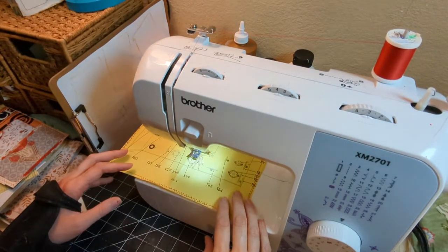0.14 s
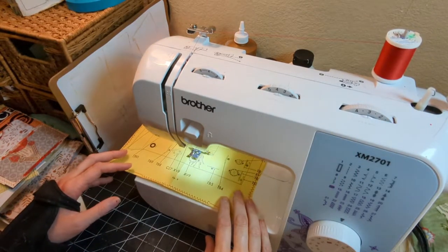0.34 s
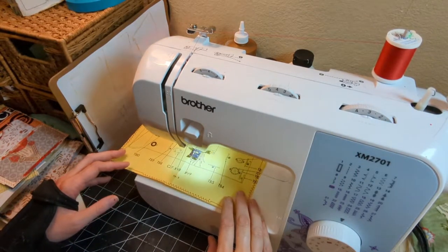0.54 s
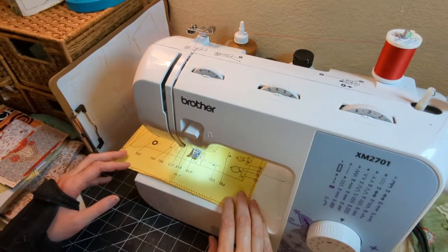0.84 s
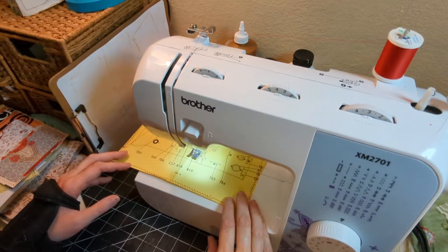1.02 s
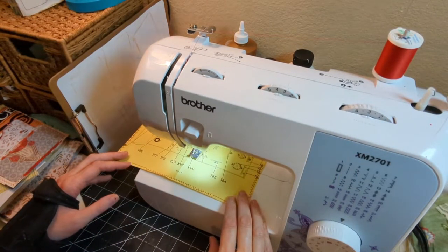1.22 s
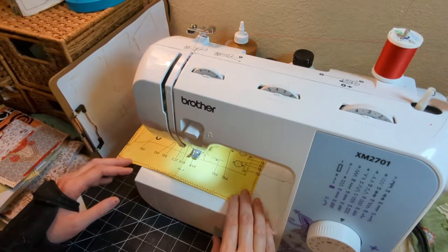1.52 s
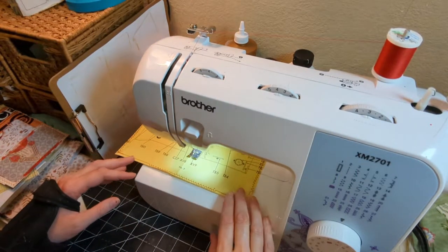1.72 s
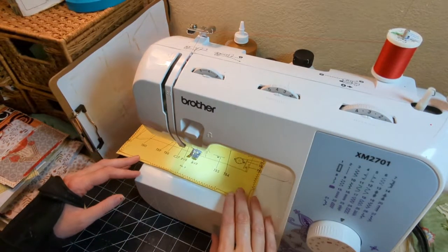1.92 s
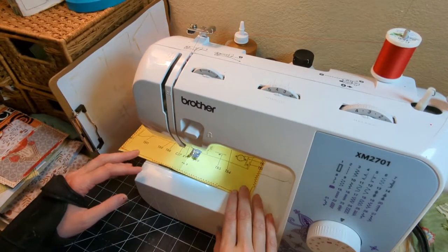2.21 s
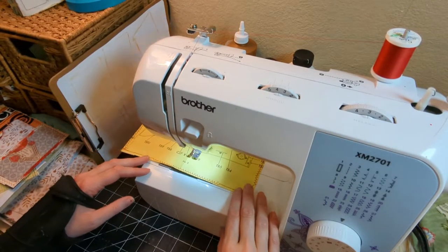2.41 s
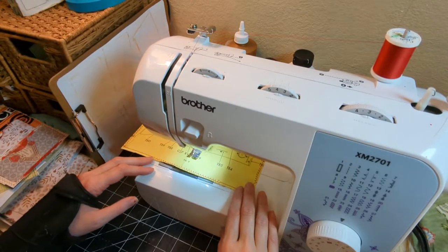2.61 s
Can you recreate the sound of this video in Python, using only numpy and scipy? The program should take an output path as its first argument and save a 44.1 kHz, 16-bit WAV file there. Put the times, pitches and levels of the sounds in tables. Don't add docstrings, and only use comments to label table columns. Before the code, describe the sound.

An electric sewing machine stitches steadily, its motor whining under sharp metallic needle snaps five times a second

```python
import sys
import numpy as np
from scipy import signal
from scipy.fft import rfft, irfft, next_fast_len
from scipy.io import wavfile
from scipy.ndimage import uniform_filter1d, map_coordinates

SR = 44100
rng = np.random.default_rng(int(sys.argv[2]) if len(sys.argv) > 2 else 0)


def ratio(d):
    e = np.asarray(d, float) / 20
    return 10 ** e


def transcribe(u):
    v = np.clip(np.atleast_2d(u).T, -1, 1)
    q = np.round(v * 32767).astype(np.int16)
    wavfile.write(sys.argv[1], SR, q)


N = 121275

# (time [s], tone [Hz], level [dB])
MOTOR_RUN = [(0, 438, -34.5), (0.071, 448.6, -32), (.22, 460.2, -31), (.42, 451.8, -29), (.6, 451, -30),
             (.82, 458.9, -28), (1.0, 454, -28.5), (1.099, 462.2, -27.5), (1.2, 459.5, -37),
             (1.38, 456.1, -26), (1.46, 458.6, -27), (1.62, 462.2, -32), (1.83, 457.1, -25.5),
             (1.97, 456, -28.5), (2.15, 460.6, -30.5), (2.4, 452.9, -26), (2.56, 458, -31),
             (2.75, 454.5, -28)]
# (multiple of the main tone, level [dB])
MOTOR_OVERTONES = [(2, -24), (1.76, -27), (1.35, -22.5), (.74, -18.5)]
# (frequency [Hz], level [dB per Hz])
RUMBLE_COLOUR = [(15, -66), (25, -40), (279, -18.5), (395, -15), (451, -7), (524, -21), (608, -18.5),
                 (904, -24.5), (1300, -49), (1690, -67), (2860, -120)]
# (frequency [Hz], level [dB per Hz])
HISS_COLOUR = [(590, -30), (1000, 0), (1100, -11.5), (2140, -1), (4760, -17), (8970, -20.5), (14700, -18.5),
               (15900, -27), (16500, -52)]
# (frequency [Hz], width [Hz], boost [dB])
PANEL_RINGS = [(88.6, 8.5, 9.5), (236, 9.9, 6), (343, 88, -4.5), (384.2, 10.3, 8.5), (630, 350, 1),
               (990, 62, 3.5), (1226, 71.4, 18.5), (1860, 2600, 0.5)]
# (frequency [Hz], likeness [0 to 1])
RUMBLE_ALIKE = [(100, 0.97), (400, 0.97), (900, 0.59)]
# (frequency [Hz], likeness [0 to 1])
HISS_ALIKE = [(1200, 0.07), (4000, 0.2), (12000, 0.15)]
# (time [s], motor dip [dB], half length [s])
BELT_SLIPS = [(0.026, 12.5, 0.012), (0.254, 2, 0.018), (.62, 4.5, 0.013), (0.765, 8, 0.024),
              (1.145, 13, .025), (1.244, 7.5, 0.021), (1.339, 12, 0.015), (1.423, 5, .013), (1.6, 5, .012),
              (1.718, 11.5, .016), (1.786, 7, 0.019), (1.921, 4.5, 0.018), (2.115, 11, 0.017),
              (2.18, 4.5, 0.021), (2.299, 6, .02), (2.57, 7.5, 0.015), (2.685, 12, 0.025)]
# (time [s], peak [dB], brightness [dB], motor dip [dB])
PUNCTURES = [(0.1186, -19.5, -6.5, 9.5), (0.3191, -31, 0, 2), (0.5113, -19, -13, 12.5),
             (0.7106, -26, -8, 0.5), (0.9098, -5, -10, 7.5), (1.0962, -8, -14, -2), (1.292, -15.5, -21, 1),
             (1.479, -19, -14, 10), (1.6672, -16.5, -12, 2.5), (1.8569, -10.5, -11, 11.5),
             (2.05, -12, -7, 2.5), (2.2456, -7.5, -8.5, 2.5), (2.4405, -12.5, -16, 14),
             (2.6338, -14.5, -15, -0.5)]
PUNCTURE_SAG = [18, 10, 32, 9, 24, 13, 5, 21, 6, 24, 8, 14, 27, 10]
# (time [s], level [dB], length [s])
FEED_SCRAPES = [(0.05, -33, 0.0083), (0.243, -37.5, 0.044), (0.4432, -32.5, 0.0094), (0.642, -32, 0.0091),
                (0.826, -30.5, 0.014), (1.0244, -35, 0.017), (1.217, -33.5, 0.039), (1.406, -33, 0.022),
                (1.592, -30.5, 0.013), (1.7807, -29, 0.01), (1.9834, -33, 0.017), (2.168, -31.5, 0.023),
                (2.3582, -30, 0.019), (2.5601, -26.5, 0.015)]
# (time [s], peak [dB])
FEED_CLACKS = [(0.0533, -33), (0.079, -39), (0.2508, -39), (0.442, -27), (0.4554, -49), (0.653, -32),
               (0.8443, -34.5), (1.0296, -36), (1.037, -37), (1.0539, -25), (1.2241, -37), (1.2462, -38),
               (1.4107, -34), (1.426, -44), (1.6038, -37), (1.789, -36), (1.7977, -33), (1.9868, -34),
               (1.9994, -40), (2.1735, -39), (2.1957, -45), (2.3651, -39), (2.38, -30.5), (2.5651, -30),
               (2.579, -33)]
# (time [s], level [dB])
HOOK_TICKS = [(0.03, -45), (0.354, -54), (0.397, -53), (0.5856, -63), (0.7875, -40), (1.5575, -54),
              (1.7081, -54), (2.1222, -52.5), (2.335, -53)]
# (frequency [Hz], level [dB per Hz])
SCRAPE_COLOUR = [(710, -2), (1500, -1.5), (2640, 2), (4190, -2), (6500, -11), (9200, -6), (14800, -12),
                 (16300, -19)]
# (time after contact [s], level [dB])
PAPER_CRACKS = [(.0012, 0), (.0023, -5), (.0036, -13), (.0052, -11), (.0078, -17)]
# (frequency [Hz], width [Hz], level [dB])
PLATE_RINGS = [(2772, 360, 3), (4200, 260, 5.5), (5295, 430, 5.5), (6390, 310, 5.5), (7400, 430, 1.5),
               (8995, 167, 14), (9620, 180, 7), (9876, 194, 15.5), (9830, 430, 4), (11000, 1260, 12),
               (13660, 480, 6), (13750, 230, -10), (14660, 360, 2), (14900, 570, 7.5)]
# (frequency [Hz], left over right [dB])
NEEDLE_BALANCE = [(2400, 8), (3500, -9), (5000, -4.5), (7200, 13.5), (10400, 1), (15000, .5)]
# (frequency [Hz], left side lead [radians])
NEEDLE_LEAD = [(100, 0), (1000, -1.5), (3400, 3.5), (5000, 5), (7200, 7), (9000, 7.5), (12000, 8.5),
               (15000, 7)]
# (frequency [Hz], level [dB per Hz])
DRAG_COLOUR = [(880, -53), (2200, -9), (4150, -11.5), (6950, -6), (9300, -5), (12000, -6), (15000, -23),
               (16700, -58)]
# (frequency [Hz], level [dB per Hz])
PULL_COLOUR = [(1760, -30), (5000, -28), (8000, -3), (9500, 8), (13300, 1.5), (15400, 1), (16500, -30)]
THREAD_PULLS = [4, 8, -13, 12.5, 7, 4, 4, 0, 7, 3.5, 7, 15, 9.5, 11.5]

TIME = np.arange(N) / SR
SIDES = np.array([[1], [-1]])
LEFT_LEAD_S = 0.00017
TOP_HZ = 16000


def unit(x):
    return x / np.sqrt(np.mean(x ** 2) + 1e-20)


def along(points, hz):
    f, v = np.transpose(points)
    below = v[0] - 30 * (v.min() < -5)
    return np.interp(np.log(hz + 1), np.log(f + 1), v, left=below)


def wobble(rate):
    knots = rng.standard_normal(int(N * rate / SR) + 4)
    return map_coordinates(knots, [np.arange(N) * rate / SR])


def filtered(x, response):
    m = next_fast_len(N + SR // 2)
    hz = np.fft.rfftfreq(m, 1 / SR)
    return irfft(rfft(x, m) * response(hz), m)[..., :N]


def placed(x, lead_s, pan_db):
    delayed = filtered(x, lambda hz: np.exp(1j * np.pi * hz * lead_s * SIDES))
    return ratio(SIDES * pan_db / 2) * delayed


def rush(colour, alike, pan_db, patchy_db=2):
    spectrum = signal.stft(rng.standard_normal((3, N)), nperseg=256)[2]
    patches = uniform_filter1d(rng.standard_normal(spectrum.shape[1:]), size=6, axis=0)
    patches = uniform_filter1d(patches, size=5, axis=1)
    noise = signal.istft(spectrum * ratio(patchy_db * unit(patches)), nperseg=256)[1][:, :N]

    def share(hz):
        return np.clip(along(alike, hz), 0, 1)

    shared = filtered(noise[0], lambda hz: colour(hz) * np.sqrt(share(hz)))
    own = filtered(noise[1:], lambda hz: colour(hz) * np.sqrt(1 - share(hz)))
    return unit(placed(shared, LEFT_LEAD_S, pan_db) + own)


def bursts(rows, rise_s, t60):
    total = 0
    for s, db, hold in rows:
        fade = ratio(db - 60 * np.clip(TIME - s - hold, 0, 1) / t60)
        total = total + fade * np.clip((TIME - s) / rise_s, 0, 1)
    return total


def motor():
    s, tone_hz, level_db = np.transpose(MOTOR_RUN)
    sag_hz, dip_db, slack_db = 0, 0, 0
    for (at, _, _, dip), drop in zip(PUNCTURES, PUNCTURE_SAG):
        spread_s = np.where(TIME < at, 0.045, 0.04)
        sag_hz = sag_hz + drop * np.exp(-abs(TIME - at) / spread_s)
        dip_db = dip_db + dip * np.exp(-((TIME - at - 0.018) / 0.017) ** 2)
    for at, dip, half in BELT_SLIPS:
        slack_db = slack_db + dip * np.exp(-((TIME - at) / half) ** 2)

    hz = np.interp(TIME, s, tone_hz) - sag_hz + 1.5 * slack_db + 1.5 * wobble(25.5)
    phase = 2 * np.pi * np.cumsum(hz) / SR
    tone_db = np.interp(TIME, s, level_db) + 3.0 - dip_db - slack_db + 0.7 * wobble(21)
    case_hz, case_width_hz = 449, 60
    tone = ratio(tone_db) / np.hypot(1, (hz - case_hz) / case_width_hz) * np.sin(phase)
    for multiple, db in MOTOR_OVERTONES:
        level = ratio(db - 26.5 + 2.7 * wobble(30.01))
        tone = tone + level * np.sin(multiple * phase + 1.56 * wobble(40))

    def panels(f):
        return ratio(sum(db / (1 + ((f - c) / w) ** 2) for c, w, db in PANEL_RINGS))

    def rumble_colour(f):
        return ratio(along(RUMBLE_COLOUR, f)) * panels(f) * (f < 1300)

    def hiss_colour(f):
        return ratio(along(HISS_COLOUR, f)) * panels(f) * (f > 1300)

    rumble = rush(rumble_colour, RUMBLE_ALIKE, 1.7, patchy_db=0.13)
    rumble = rumble * ratio(-38 + 0.57 * wobble(11.47))
    hiss = rush(hiss_colour, HISS_ALIKE, -0.82, patchy_db=2.0)
    hiss = hiss * ratio(-49.5 + 1.55 * wobble(39.3))
    return placed(tone, LEFT_LEAD_S, 1.7) + rumble + hiss


def feed():
    scrape = rush(lambda f: ratio(along(SCRAPE_COLOUR, f)), [(2000, 0.15), (9000, 0.058)], -0.19, patchy_db=3.5)
    scrape = scrape * ratio(2.05 * wobble(400))
    loudness = bursts([(s, db - 12, d + 0.0029) for s, db, d in FEED_SCRAPES], 0.0066, 0.15)
    loudness = loudness + bursts([(s, db - 11, 0.002) for s, db in FEED_CLACKS], 0.00044, 0.041)
    loudness = loudness + bursts([(s, db - 4.5, 0.004) for s, db in HOOK_TICKS], 0.0025, 0.021)
    panel_tone = np.sin(2 * np.pi * 970 * TIME) + 0.64 * np.sin(2 * np.pi * 610 * TIME)
    panel_hum = bursts([(2.134, -31, 0.012)], 0.015, 0.07) * panel_tone
    return scrape * loudness + panel_hum


def needle():
    def ring(f, c, w):
        return 1j * f * w / (c * c - f * f + 1j * f * w)

    def plate(f):
        total = ratio(2) * ring(f, 10500, 10800) ** 2
        return total + sum((-1) ** k * ratio(db) * ring(f, c, w) for k, (c, w, db) in enumerate(PLATE_RINGS))

    noise = rng.standard_normal(N)
    mean_brightness = np.mean([row[2] for row in PUNCTURES])
    scatter = rng.standard_normal((len(PUNCTURES), len(PAPER_CRACKS), 2))
    low, high = np.zeros(N), np.zeros(N)
    for (s, db, brightness, _), chances in zip(PUNCTURES, scatter):
        hit = noise * bursts([(s, db - 22.5, 0.001)], 0.00047, 0.027)
        for k, ((late, drop), (shift, swell)) in enumerate(zip(PAPER_CRACKS, chances)):
            at = round((s + late + k * 0.00006 * shift) * SR)
            hit[at] += ratio(db + drop + 1.5 * swell) * (-1) ** k
        before = TIME < s
        lead_in = noise * ratio(db - 27) * np.exp((TIME - s) / 0.0025 * before) * before
        low = low + hit
        high = high + (hit + lead_in) * ratio(brightness - mean_brightness)

    def treble(f):
        return 1 / (1 + (9600 / (f + 1)) ** 8)

    def heard(f):
        left = ratio(along(NEEDLE_BALANCE, f) / 2) * np.exp(0.5j * along(NEEDLE_LEAD, f))
        return plate(f) * left ** SIDES

    snap = filtered(low, lambda f: heard(f) * (1 - treble(f)))
    snap = snap + filtered(high, lambda f: heard(f) * treble(f))
    drag = rush(lambda f: ratio(along(DRAG_COLOUR, f)), [(3000, 0.14), (9000, 0.27)], 3.3, patchy_db=2.5)
    drag = drag * bursts([(s, -43 + 0.5 * (db + 14), 0.021) for s, db, *_ in PUNCTURES], 0.001, 0.051)
    drag = filtered(drag * ratio(2.4 * wobble(220)), lambda hz: hz < TOP_HZ)
    return ratio(7) * snap + drag


def room(x):
    t = np.arange(SR // 3) / SR
    tail = rng.standard_normal((2, len(t))) * ratio(-60 * t / 0.19) * (t > 0.004)
    tail = tail / np.linalg.norm(tail[0])
    return ratio(-15) * signal.fftconvolve(x[None], tail, axes=1)[:, :N]


def thread():
    pulls = [(s + 0.0791, -57 + db, 0.0055) for (s, *_), db in zip(PUNCTURES, THREAD_PULLS)]
    rustle = rush(lambda f: ratio(along(PULL_COLOUR, f)), [(4000, 0.31), (12000, 0.13)], 2.0, patchy_db=3.5)
    return rustle * bursts(pulls, 0.014, 0.09) * ratio(2.3 * wobble(120))


def scene():
    snap = needle()
    steady = motor() + feed() + thread() + room(snap.mean(axis=0))
    return filtered(steady, lambda hz: hz < TOP_HZ) + snap


def thinned(x):
    slot, first = 1024, 388
    hz, t, z = signal.stft(x, SR, nperseg=256)
    power = np.add.reduceat(abs(z[:, :-1]) ** 2, np.arange(0, 128, 4), axis=1).sum(axis=0)
    band_db = 10 * np.log10(power + 1e-20)
    limit_db = np.full(len(t), -99.)
    for s, db, *_ in PUNCTURES:
        centre = first + slot * round((s * SR - first) / slot)
        limit_db[abs(t * SR - centre) <= slot / 2] = -3.5 + 0.12 * (db + 28)
    usual_db = np.median(band_db, axis=1)[:, None]
    quiet = band_db < usual_db + limit_db + 3 * rng.standard_normal(band_db.shape)
    quiet = np.repeat(quiet, 4, axis=0)
    z[:, :-1] *= 1 - 0.9 * quiet * (hz[:-1, None] > 3000)
    return signal.istft(z, SR, nperseg=256)[1][:, :N]


def low_pass(x):
    return signal.sosfilt(signal.butter(12, 16850, fs=SR, output="sos"), x)


def record(dry):
    mix = thinned(filtered(dry, lambda hz: hz < 16850))
    return low_pass(mix)


dry = scene()
out = record(dry)
transcribe(out)
```